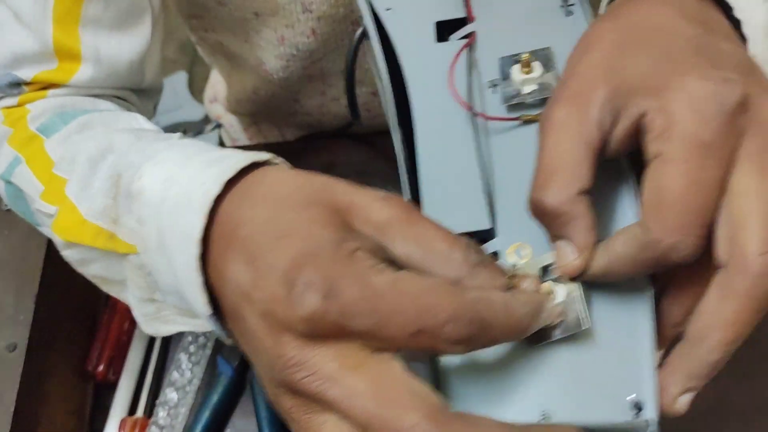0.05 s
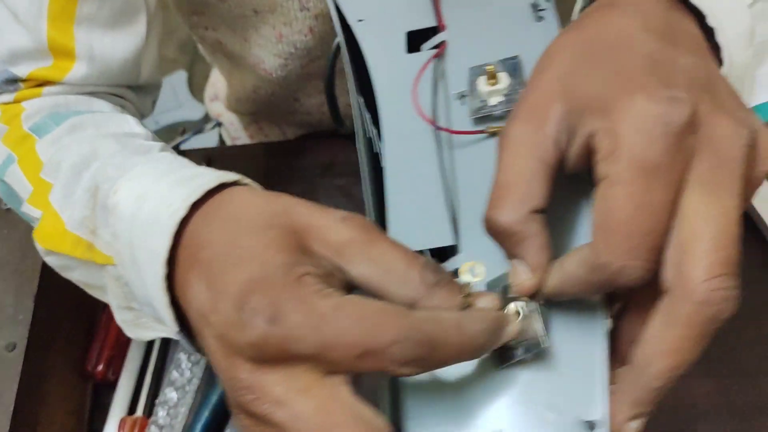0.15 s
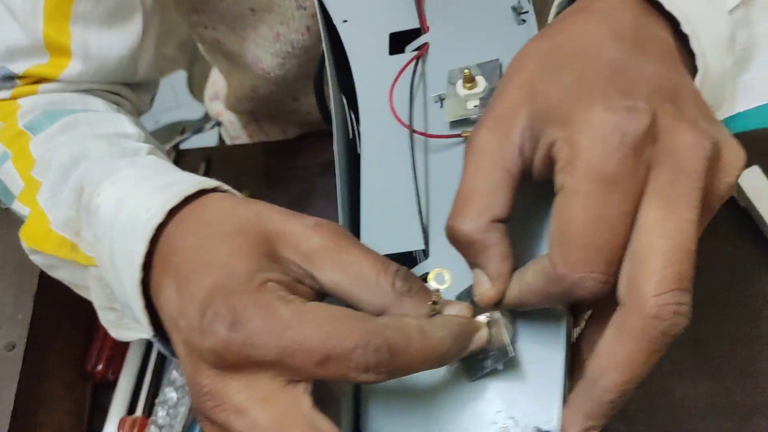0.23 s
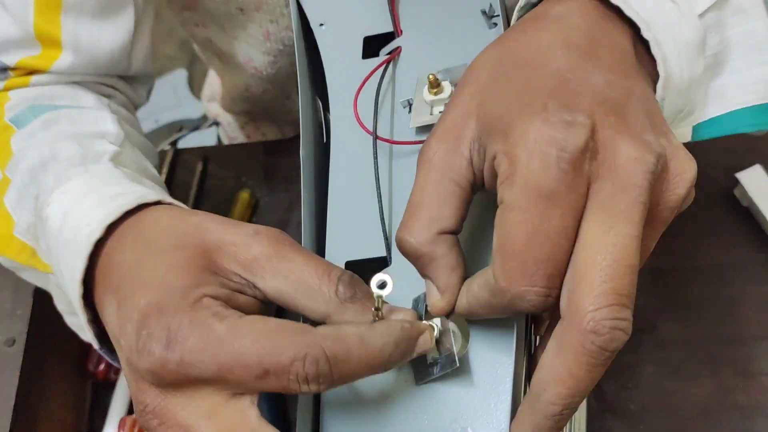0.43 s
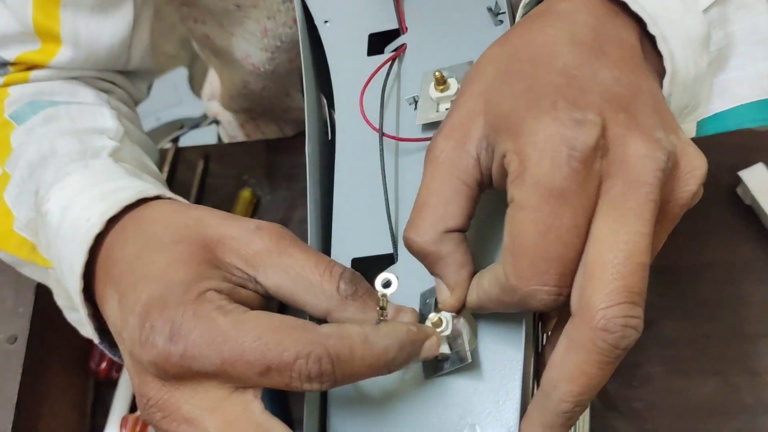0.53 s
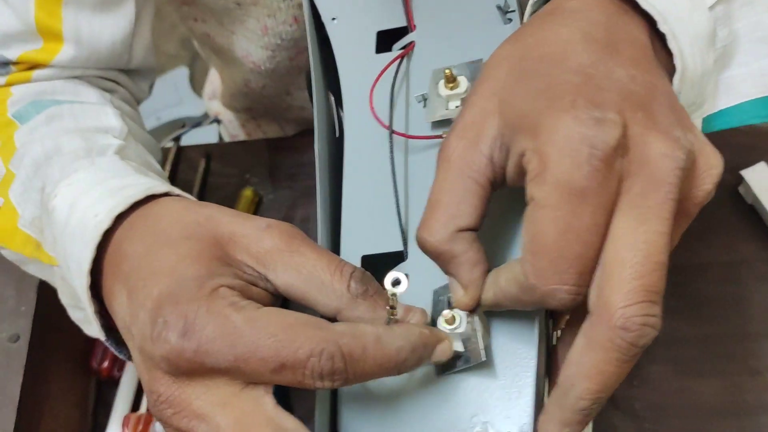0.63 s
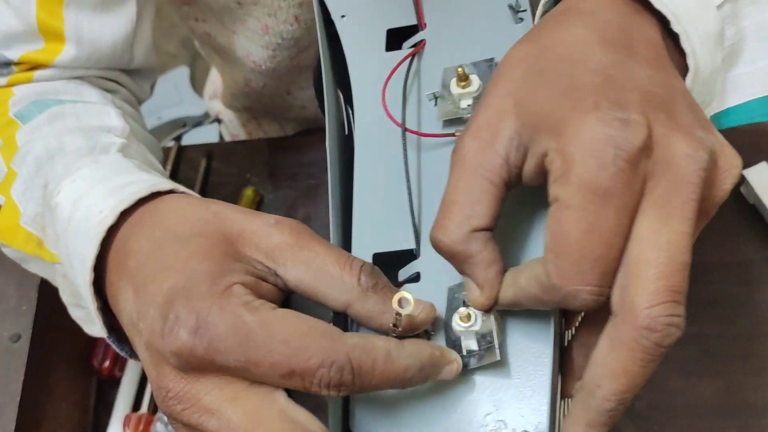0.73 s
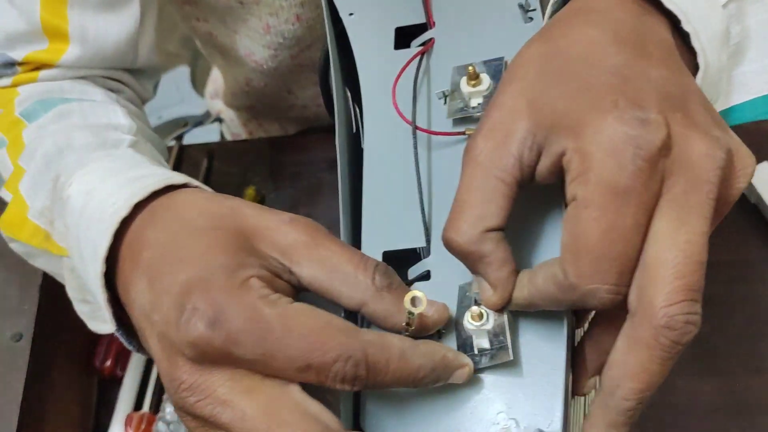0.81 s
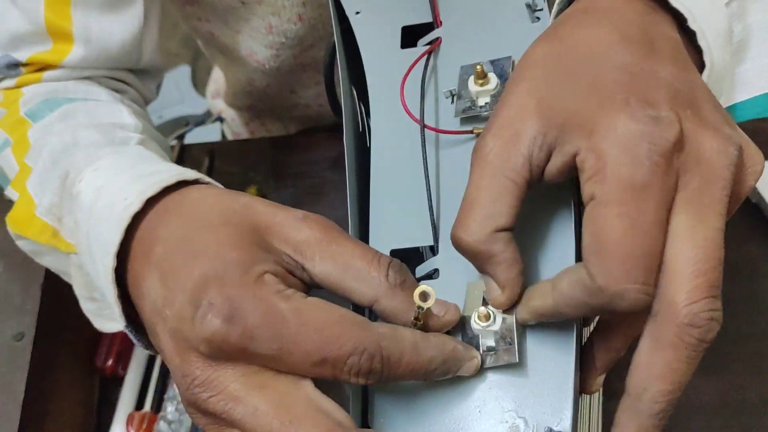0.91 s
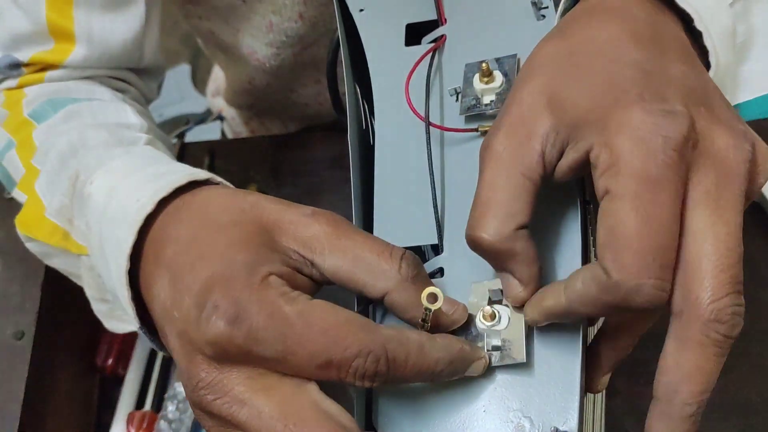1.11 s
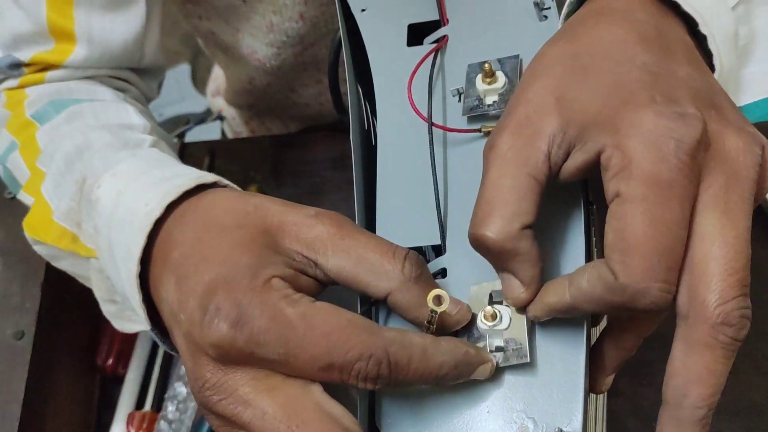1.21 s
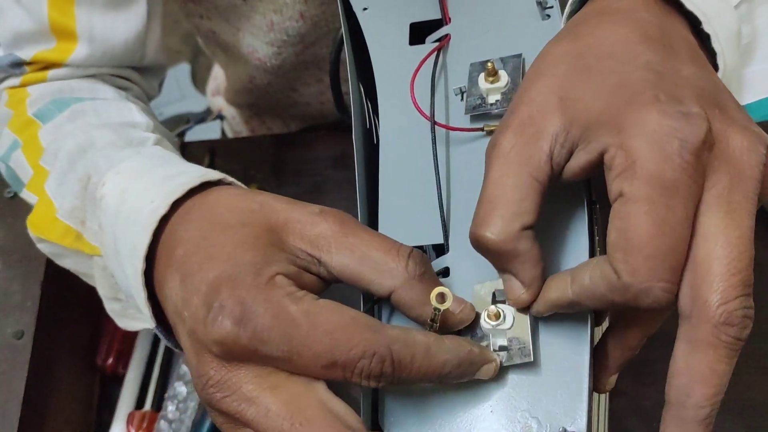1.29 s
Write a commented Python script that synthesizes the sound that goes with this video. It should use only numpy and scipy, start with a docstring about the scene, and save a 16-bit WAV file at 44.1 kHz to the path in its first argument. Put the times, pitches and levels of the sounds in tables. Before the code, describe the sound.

A thin metal strip is pressed by hand onto a sheet-metal frame: a bright tick, a sharp snap, then a loud knocking, juddering scrape, a lull, faint finger squeaks and a last clack, close up in a quiet workshop.

```python
"""A thin metal strip is pressed by hand onto a sheet-metal heater frame, heard close by in a small workshop.
Over quiet air its edge flicks free and the strip ticks and snaps; then the frame knocks and judders over
the rumbling bench in a long scrape. Fingers squeak and rub, and the strip is seated with a last clack.
Each contact is a cluster of tiny slips, convolved with the noisy, modal ring of the strip or the frame."""
import sys
import numpy as np
from scipy import signal
from scipy.fft import rfft, irfft
from scipy.io import wavfile
from scipy.ndimage import uniform_filter1d, minimum_filter1d

SR = 44100
rng = np.random.default_rng(int(sys.argv[2]) if len(sys.argv) > 2 else 0)


def dump_mix(stems):
    """Bounce the given channels to the path in sys.argv[1] as a 16-bit WAV at rate SR."""
    frames = np.atleast_2d(stems).T  # one column per channel
    limited = np.clip(frames, -1, 1)  # hard clip at full scale
    pcm = np.round(limited * 32767).astype(np.int16)
    wavfile.write(sys.argv[1], SR, pcm)


N = 59535  # length in samples


def undb(db):
    """Amplitude gain is ten to the power of decibels over twenty."""
    return 10 ** (np.asarray(db) / 20)


def unit(x):
    """Normalisation: the sum of squares, the energy, becomes one."""
    return x / np.sqrt(np.sum(x ** 2) + 1e-18)


def steady(x):
    """Normalisation: the mean square, the power, becomes one."""
    return unit(x) * np.sqrt(len(x))


def fade(t, t60):
    """Exponential decay: the amplitude falls by 60 dB in t60 seconds."""
    return np.exp(-np.log(1000) * t / t60)


def contour(hz, rows, axis=1):
    """Interpolation: a column is read linearly on a log-frequency axis."""
    rows = np.array(rows, float)
    return np.interp(np.log(hz + 1), np.log(rows[:, 0]), rows[:, axis])


def resonate(x, hz, width_hz):
    """Resonance: two equal narrow peak filters in series give steep skirts."""
    b, a = signal.iirpeak(hz, hz / width_hz, fs=SR)
    once = signal.lfilter(b, a, x)
    return steady(signal.lfilter(b, a, once))


def tint(x, rows):
    """Minimum-phase filtering: a causal filter sets the broad spectrum and keeps its fine structure."""
    hz, spectrum = np.fft.rfftfreq(N, 1 / SR), rfft(x)
    total, bins = np.cumsum(np.abs(spectrum) ** 2), np.arange(len(hz))
    reach = 40 + bins // 8  # half-width of the spectral average, in bins
    lo = np.maximum(bins - reach, 0)
    hi = np.minimum(bins + reach, len(hz) - 1)
    broad = np.sqrt((total[hi] - total[lo]) / (hi - lo) + 1e-12)
    cepstrum = irfft(np.log(undb(contour(hz, rows)) / broad), N)
    # Doubling the causal half of the cepstrum gives the minimum-phase response
    response = np.exp(rfft(2 * cepstrum[:N // 2], N))
    return unit(irfft(spectrum * response, N))


def slips():
    """Dry friction: sparse random impulses of either sign and uneven size."""
    slips_per_s, scatter_db = 1500, 14
    happens = rng.random(N) < slips_per_s / SR
    sign = rng.choice([-1, 1], N)
    return steady(happens * sign * undb(scatter_db * rng.uniform(-1, 1, N)))


def touch(t, at, build, chatter):
    """Impact with friction: slips crowd up to a blow and chatter away after it."""
    blow_share, level_window_s = .6, .022
    envelope = np.exp(-np.maximum((at - t) / build, (t - at) / chatter))
    push = unit(slips() * envelope)
    push[int(at * SR)] += blow_share
    # A broadly white force, with unit rms if its energy filled the level window
    return tint(push, [(1, 0)]) * np.sqrt(SR * level_window_s)


def contacts(t, rows):
    """Superposition: the forces of successive contacts add in each register."""
    return sum(undb(dbs)[:, None] * touch(t, at, build, chatter) for at, build, chatter, *dbs in rows)


def steel(t, colour, modes):
    """Impulse response: a crack, a dense wash that dies away, and a few slightly rough modes."""
    early_t60_s, early_db, crack_s, crack_db = 0.04, 3, 0.0028, 3.5
    sheet_db = 5.5  # wash before the final tint, against the modes
    mode_blur_hz = 8  # sets the random phase wander, for a rougher, less pure ring
    wash, hz = rfft(rng.standard_normal(N)), np.fft.rfftfreq(N, 1 / SR)
    centres = np.geomspace(40, 16000, 10)
    early = undb(early_db) * fade(t, early_t60_s) + undb(crack_db) * np.exp(-t / crack_s)
    sheet = 0
    for centre, pick in zip(centres, np.eye(len(centres))):
        # Overlapping triangular bands, each with its own decay
        weight = np.interp(np.log(hz + 1), np.log(centres), pick)
        band = irfft(wash * weight, N)
        sheet = sheet + band * (fade(t, contour(centre, colour, axis=2)) + early)
    ring = undb(sheet_db) * tint(sheet, colour)
    for k, (f, db, t60) in enumerate(modes):
        # Random phase wander widens each mode
        wander = np.cumsum(rng.standard_normal(N)) * np.sqrt(2 * np.pi * mode_blur_hz / SR)
        wander = uniform_filter1d(wander, size=400)
        mode = np.sin(2 * np.pi * f * t + wander) * fade(t, t60)
        ring = ring + (-1) ** k * undb(db) * unit(mode)  # alternate polarity
    return tint(ring, colour)


def sound(forces, ring):
    """Convolution: each register's force drives its own band of the ring."""
    # Band edges in Hz between thud, clunk, clang and zing
    crossover_hz = [312, 847, 2437]
    registers = []
    for edge in crossover_hz:
        low = signal.butter(6, edge, "low", fs=SR, output="sos")
        high = signal.butter(6, edge, "high", fs=SR, output="sos")
        registers.append(signal.sosfilt(low, ring))
        ring = signal.sosfilt(high, ring)
    registers.append(ring)
    return sum(signal.fftconvolve(force, unit(part))[:N] for force, part in zip(forces, registers))


def air():
    """Stationary noise: white noise is shaped in frequency into the quiet air of the room."""
    # Each row: frequency in Hz, relative level in dB per Hz
    air_colour = [(30, 2.5), (150, 0.5), (600, 1.5), (1200, -6), (3000, -9), (9000, -12.5), (16000, -14.5)]
    level_db = -67.5
    gain = undb(contour(np.fft.rfftfreq(N, 1 / SR), air_colour))
    return undb(level_db) * steady(irfft(rfft(rng.standard_normal(N)) * gain, N))


def flick(t):
    """Impulsive release: the strip's edge snaps free and rings with a thin bright tick."""
    # Dense ring of the edge. Each row: frequency in Hz, relative level in dB per Hz, t60 in seconds
    edge_colour = [(100, -34, 0.46), (2225, -22, 0.22), (3095, -10.5, .3), (3996, 2.5, 0.11),
                   (5040, 2.5, 0.14), (5664, -7.5, .36), (7200, -7.5, 0.27), (8190, -17.5, .34),
                   (9800, -36, .3), (16000, -55, 0.25)]
    # Modes of the edge. Each row: frequency in Hz, relative energy in dB before tinting, t60 in seconds
    edge_modes = [(3970, -8.5, 0.1), (4920, -13.5, 0.086), (5204, -26, 0.33)]
    at_s, build_s, chatter_s, level_db = .0782, 0.00017, 0.0076, -33.5
    force = touch(t, at_s, build_s, chatter_s)
    return undb(level_db) * signal.fftconvolve(force, steel(t, edge_colour, edge_modes))[:N]


def strip(t):
    """Forced vibration: the strip rings at each contact with the frame."""
    # Each row: time, build-up and chatter in seconds, then thud, clunk, clang and zing in dB
    strip_contacts = [ (0.0860, 0.00086, 0.048, -48, -52, -55.5, -63),
                      (0.2092, 0.0035, .006, -48, -53.5, -45, -48.5),
                      (0.227, 0.0029, 0.0044, -57, -44, -28.5, -36),
                      (0.2350, 0.0025, 0.0055, -40.5, -32, -19, -20),
                      (1.0215, 0.00033, 0.0049, -66, -58.5, -70, -82),
                      (1.125, 0.0055, 0.011, -47.5, -46, -40, -55),
                      (1.144, 0.0051, 0.0064, -40, -33.5, -24, -31),
                      (1.1610, 0.0057, 0.0086, -40.5, -28.5, -29, -38),
                      (1.246, 0.017, 0.0068, -54.5, -58, -57.5, -65)]
    # Dense ring of the strip. Each row: frequency in Hz, relative level in dB per Hz, t60 in seconds
    strip_colour = [(40.8, -20.5, .3), (108, -16, .3), (183.6, -2, 0.32), (280, 0.5, .4), (510, -1, 0.35),
                    (740, 4.5, 0.48), (1265.5, 9, .3), (1500, 4, .26), (2054, 11, 0.087), (2400, 8, 0.1),
                    (3050, -1.5, .3), (4230, -7, 0.23), (5940, -13.5, .3), (6780, -9.5, 0.16),
                    (8476, -19.5, 0.1), (8750, -12.5, .26), (9520, -27, .25), (11570, -44.5, .25),
                    (14050, -34, .25), (15870, -53.5, 0.22)]
    # Modes of the strip. Each row: frequency in Hz, relative energy in dB before tinting, t60 in seconds
    strip_modes = [(390, -6, 0.13), (718, -14.5, 0.24), (1146, -19, .24), (1227, -4, 0.23),
                   (1565, -13.5, 0.31), (1850, -4.5, 0.091), (2070, -16, 0.14), (2852, -6.5, 0.065),
                   (3210, -17.5, 0.081), (3770, -29, 0.24), (3980, -22.5, .12), (4744, -19, 0.13),
                   (4770, -20, .12)]
    return sound(contacts(t, strip_contacts), steel(t, strip_colour, strip_modes))


def bench(t):
    """Low resonance: noise through a narrow peak is the bench rumbling while the frame moves."""
    # Times in seconds: start of rise, full level, start of release, silence
    bench_s = [.34, .48, .62, .72]
    resonance_hz, width_hz, level_db = 59.3, 13, -41
    rumble = resonate(rng.standard_normal(N), resonance_hz, width_hz)
    return undb(level_db) * np.interp(t, bench_s, [0, 1, 1, 0]) * rumble


def drag(t):
    """Stick-slip: the judder slows as the frame is braked, then quickens a little, over fine grit."""
    # Each row: time in seconds, push in dB before the register trims, grit in dB, mean judder rate in Hz
    drag_rows = [(.345, -36, -49, 190.2), (0.372, -6, -26.5, 183.9), (0.418, -19, -26.5, 181.4),
                 (0.451, -16.5, -41, 159.4), (.485, -9, -24, 124.9), (.515, -21.5, -50, 104.5),
                 (0.541, -25.5, -57, 109.9), (.565, -20, -46.5, 121.2), (.605, -19.5, -49.5, 124),
                 (0.638, -27.5, -54, 123.1), (.69, -32.5, -58.5, 122.9), (.73, -49.5, -73.5, 123.2),
                 (.76, -64, -70, 120)]
    # Register trims of the push in dB: thud, clunk, clang
    trims_db = [-3.5, -0.5, -9]
    period_spread, size_scatter_db = .1, 3.5  # standard deviations: log period, size
    slip_db = -8  # continuous slips beside the judder
    times, push_db, grit_db, judder_hz = np.array(drag_rows).T
    chance = rng.standard_normal((120, 2))
    judder, at = np.zeros(N), times[0]
    for stretch, size in chance:
        period = np.exp(period_spread * stretch) / np.interp(at, times, judder_hz)
        at += period
        if at < times[-1]:
            # Power stays the same at any judder rate
            judder[int(at * SR)] = undb(size_scatter_db * size) * np.sqrt(SR * period) / 2
    friction = judder + undb(slip_db) * slips()
    moving = (t > times[0]) * (t < times[-1])
    push = undb(np.interp(t, times, push_db)) * moving
    grit = undb(np.interp(t, times, grit_db)) * moving
    # The grit alone drives the zing register
    return np.array([undb(db) * push * friction for db in trims_db] + [grit * slips()])


def frame(t):
    """Forced vibration: knocks on the bench and the drag excite the same sheet-metal ring."""
    # Each row: time, build-up and chatter in seconds, then thud, clunk, clang and zing in dB
    frame_knocks = [ (0.3450, 0.0009, 0.0096, -9.5, -10.5, -24.5, -37.5),
                    (0.3920, .0040, 0.01, -24, -16.5, -12, -18.5),
                    (0.4645, 0.00044, 0.011, -9.5, -23, -14, -26),
                    (0.4980, 0.0064, 0.007, -21.5, -13, -18.5, -59),
                    (0.6950, 0.0083, 0.0026, -35, -38, -43, -48.5),
                    (0.9263, 0.000416, 0.00088, -52.5, -47.5, -67.5, -93)]
    # Dense ring of the frame. Each row: frequency in Hz, relative level in dB per Hz, t60 in seconds
    sheet_colour = [(40, -17, .45), (75, -14.5, 0.14), (98.8, 2, 0.57), (189, 9, 0.35), (299, 5.5, 0.11),
                    (400, 4.5, .22), (555, 0.5, 0.27), (700, -2, .25), (1130, -3, 0.36), (1470, -8.5, 0.43),
                    (1946, -10, 0.096), (2200, -12, 0.083), (3200, -10.5, 0.28), (4300, -14, 0.17),
                    (5800, -22.5, .3), (7130, -20.5, .32), (8900, -27, 0.27), (10200, -38.5, .3),
                    (13900, -45.5, .3), (16000, -56, .3)]
    # Modes of the frame. Each row: frequency in Hz, relative energy in dB before tinting, t60 in seconds
    frame_modes = [(110.4, -1.5, 0.18), (175, -7, 0.053), (254.2, -5.5, 0.53), (316.6, -6, 0.11),
                   (380.3, -9.5, .2), (550, -15, 0.092), (713.3, -17, 0.54), (868, -10.5, .2),
                   (957, -13.5, 0.08), (1098, -19, .26), (1556, -23.5, .2), (1910, -19, 0.14),
                   (3160, -36.5, 0.19), (3730, -27, 0.093)]
    forces = contacts(t, frame_knocks) + drag(t)
    return sound(forces, steel(t, sheet_colour, frame_modes))


def fingers(t):
    """Friction-driven resonance: fingers squeak faintly, then rub with a hollow tone and a squeal."""
    # Each row: time in seconds, hollow rub in dB, squeal in dB
    rub_rows = [(0.909, -76.5, -87.5), (.935, -60, -77.5), (0.973, -61, -69), (1.005, -66, -59.5),
                (1.016, -55.5, -66), (1.025, -49.5, -65), (1.06, -54, -65.5), (1.10, -57, -66.5),
                (1.12, -51, -33.5), (1.14, -42, -39), (1.22, -49.5, -53), (1.27, -49, -66),
                (1.31, -60.5, -74), (1.35, -54, -68)]
    # Resonances of squeak, rub and squeal. Each row: frequency in Hz, width in Hz, relative level in dB
    squeak_peaks = [(4640, 95, 0.5), (7320, 1900, -1.5)]
    rub_peaks = [(689, 100, 0.51)]
    squeal_peaks = [(1380, 190, -4.5), (1853, 200, -2)]
    squeak_s, squeak_len_s, squeak_db = .92, .028, -69.5
    times, rub_db, squeal_db = np.array(rub_rows).T

    def friction(peaks):
        """Parallel resonances: separate streams of slips excite each one."""
        return sum(undb(db) * resonate(slips(), hz, width) for hz, width, db in peaks)

    def level(db):
        """Amplitude envelope: levels are interpolated in decibels from the first row on."""
        return undb(np.interp(t, times, db)) * (t > times[0])

    swell = np.exp(-((t - squeak_s) / squeak_len_s) ** 2)
    squeak = undb(squeak_db) * swell * friction(squeak_peaks)
    return squeak + level(rub_db) * friction(rub_peaks) + level(squeal_db) * friction(squeal_peaks)


def scene():
    """Superposition: strip, frame, bench and fingers add to the quiet air of the room."""
    t = np.arange(N) / SR
    return (air() + flick(t) + strip(t) + bench(t) + frame(t) + fingers(t))[None]


def record(dry):
    """Peak limiting: a smoothed gain holds the loudest peaks down, then a steep low-pass cuts the top."""
    ceiling, window, top_hz = .88, 301, 16050  # window in samples
    gain = np.minimum(1, ceiling / (np.abs(dry) + 1e-9))
    gain = uniform_filter1d(minimum_filter1d(gain, size=window), size=window)
    low_pass = signal.ellip(10, .2, 80, top_hz, fs=SR, output="sos")  # 0.2 dB ripple, 80 dB stop band
    return signal.sosfilt(low_pass, dry * gain)


dry = scene()
out = record(dry)
dump_mix(out)
```